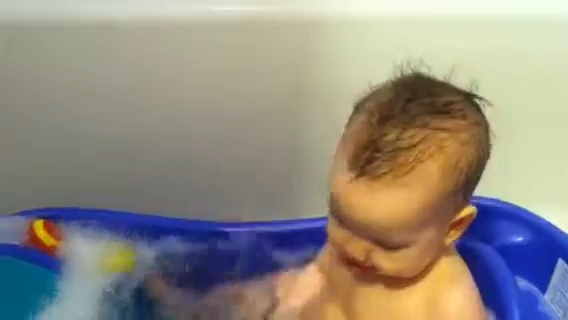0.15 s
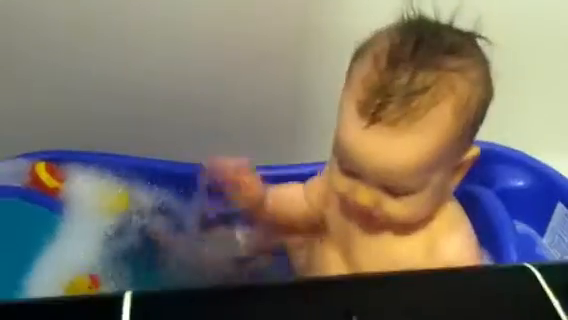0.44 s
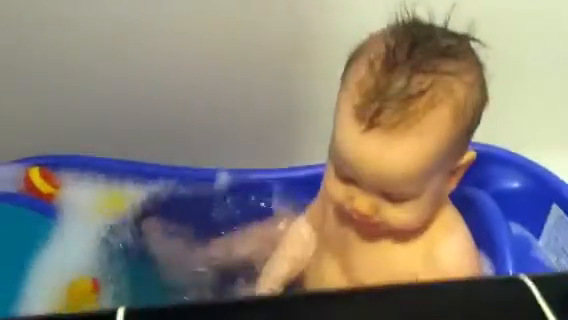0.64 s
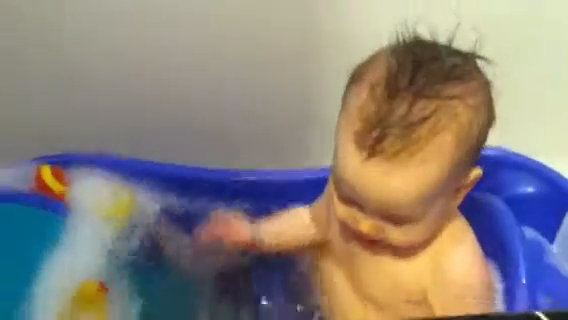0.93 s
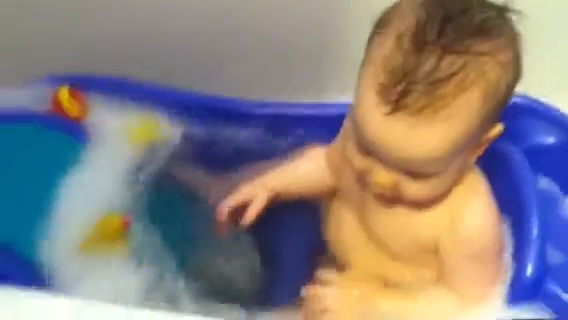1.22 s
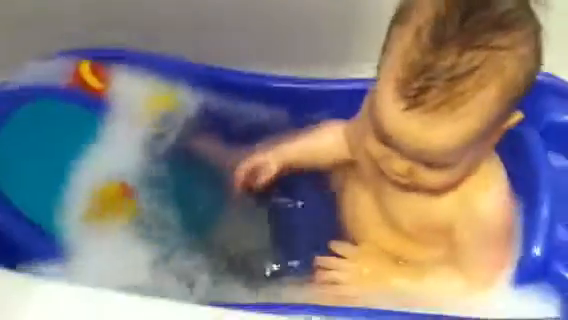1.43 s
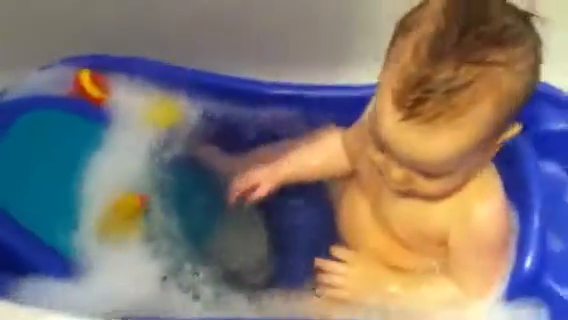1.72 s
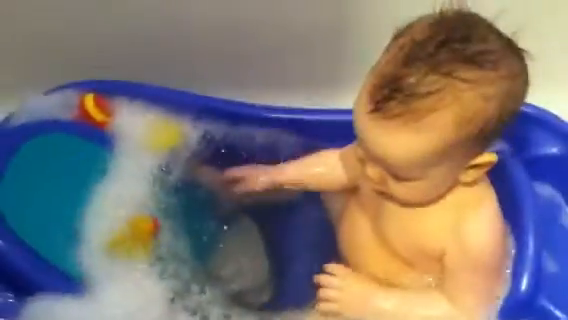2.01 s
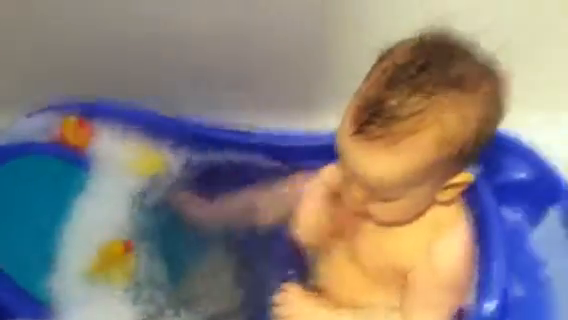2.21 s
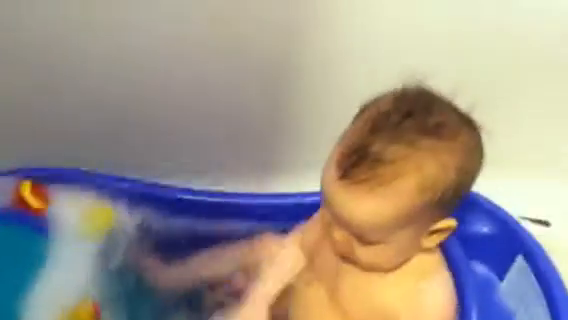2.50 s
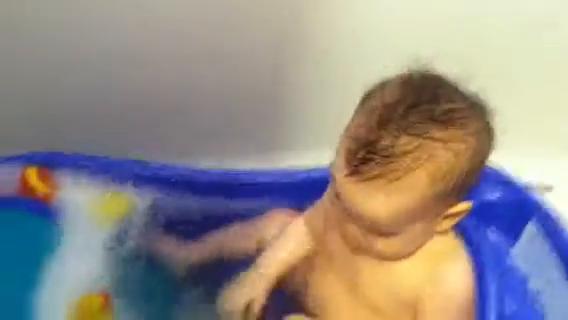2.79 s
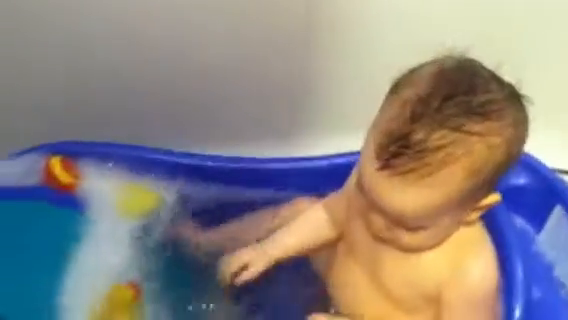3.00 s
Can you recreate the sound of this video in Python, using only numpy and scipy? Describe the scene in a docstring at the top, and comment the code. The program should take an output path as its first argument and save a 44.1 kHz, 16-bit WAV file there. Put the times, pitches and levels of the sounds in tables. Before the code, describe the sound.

Water slaps and splashes in a plastic baby tub, busy with gurgles and plinking drops at first, then a quiet lull, then one sharp loud slap near the end; small echoing bathroom, close microphone.

```python
"""Over a faint low rumble, an arm stirs clouds of bubbles and fizzing foam in a plastic tub of bath water.
Among them single drops plink, each a tick and a ringing bubble that climbs in pitch, with weaker ones behind.
A baby's slaps fall in between: a noise crack, coloured bursts of spatter for thump, plunge and spray, and a
pitched churn. The small hard-walled bathroom adds close tub echoes and a brief diffuse tail by convolution."""
import sys
import numpy as np
from scipy import signal
from scipy.fft import rfft, irfft, next_fast_len
from scipy.io import wavfile

SR = 44100
rng = np.random.default_rng(int(sys.argv[2]) if len(sys.argv) > 2 else 0)


def wav_out(sig):
    """Save sig, one row per channel (or a flat mono array), as 16-bit PCM at SR to the path in sys.argv[1]."""
    wavfile.write(sys.argv[1], SR, np.round(np.clip(np.atleast_2d(sig).T, -1, 1) * 32767).astype(np.int16))


N = 138915
TIME = np.arange(N) / SR


def from_db(db):
    """Decibels to amplitude gain."""
    return 10 ** (np.asarray(db) / 20)


def rms_one(x):
    """Scale to unit rms."""
    return x / np.sqrt(np.mean(x ** 2) + 1e-20)


def at_hz(points, hz):
    """Interpolate a (hz, value) table on a log-frequency axis."""
    table = np.array(points)
    return np.interp(np.log(hz + 1e-9), np.log(table[:, 0]), table[:, 1])


def colour(x, spectrum):
    """Causal minimum-phase filter with the shape of the spectrum and unit power gain."""
    size = 2 * next_fast_len(len(x))
    hz = np.arange(size // 2 + 1) * SR / size
    gain = rms_one(from_db(at_hz(spectrum, hz)))
    # folding the cepstrum onto positive time makes the phase minimum
    cepstrum = irfft(np.log(gain))
    cepstrum[1:size // 2] *= 2
    cepstrum[size // 2 + 1:] = 0
    response = np.exp(rfft(cepstrum))
    return irfft(rfft(x, size) * response)[:len(x)]


def octave_band(centre_hz, half_width_oct):
    """Band edges in Hz, equally far in octaves from the centre."""
    return centre_hz * 2 ** (half_width_oct * np.array([-1, 1]))


def bandpass(x, band_hz):
    """Second-order Butterworth band-pass."""
    return signal.sosfilt(signal.butter(2, band_hz, "band", fs=SR, output="sos"), x)


def add(out, start_s, sound):
    """Mix a short sound in at its start time."""
    i = int(start_s * SR)
    if 0 <= i < len(out):
        out[i:i + len(sound)] += sound[:len(out) - i]


def swell(t, rise_s, fall_s):
    """Exponential rise to 1 at t = 0, then exponential fall."""
    exponent = np.where(t < 0, t / rise_s, -t / fall_s)
    return np.exp(np.maximum(exponent, -40))


def grains(per_s, spread_db, size=N):
    """Random clicks of uneven size and sign; rms 1."""
    born = rng.random(size) < per_s / SR
    level = from_db(spread_db * np.clip(rng.standard_normal(size), -2, 2))
    return rms_one(born * level * rng.choice([-1, 1], size))


def resonance(x, hz, width_hz):
    """A two-pole resonance with gain 1 on top."""
    r = np.exp(-np.pi * width_hz / SR)
    zeros = np.array([1, 0, -1]) * (1 - r * r) / 2
    poles = [1, -2 * r * np.cos(2 * np.pi * hz / SR), r * r]
    return signal.lfilter(zeros, poles, x)


# rumble and hiss, relative spectrum: hz [Hz], density_db [dB per Hz]
RUMBLE_SPECTRUM = [(25, -14), (50, -23), (80, -8), (250, -1.5), (420, 0), (1300, -10), (2200, -11.5),
                   (9000, -21.5), (15500, -33)]
# low resonances in the rumble: hz [Hz], level_db [dB rms]
LOW_RESONANCES = [(251, -74.5), (383, -82), (551, -82)]
# one faint low hum: peak_s [s], half_length_s [s], level_db [dB rms at peak], pitch_hz [Hz]
HUM = (1.974, 0.17, -71.5, 254)
RUMBLE_DB, RESONANCE_WIDTH_HZ = -65.5, 8


def background():
    """Steady coloured noise, noise-fed low resonances and a sine hum that swells and fades."""
    out = from_db(RUMBLE_DB) * colour(rng.standard_normal(N), RUMBLE_SPECTRUM)
    for hz, level_db in LOW_RESONANCES:
        ring = resonance(rng.standard_normal(N), hz, RESONANCE_WIDTH_HZ)
        out += from_db(level_db) * rms_one(ring)
    peak_s, half_length_s, level_db, pitch_hz = HUM
    hum = rms_one(np.sin(2 * np.pi * pitch_hz * TIME))
    envelope = np.exp(-((TIME - peak_s) / half_length_s) ** 2)
    return out + from_db(level_db) * envelope * hum


PINCH_CYCLES = 1


def bubble(hz, t60_s, rise_share):
    """An air pocket pinches off, rings and climbs by a share of its pitch over one t60 near the surface."""
    t = TIME[:int(t60_s * SR) + 2]
    pinch = 1 - np.exp(-(t * hz / PINCH_CYCLES) ** 2)
    decay = from_db(-60 * t / t60_s)
    cycles = hz * (t + rise_share * t * t / (2 * t60_s))
    return pinch * decay * np.sin(2 * np.pi * cycles)


BUBBLE_T60_CYCLES, BUBBLE_RISE_SHARE, BUBBLE_SIZE_DB = 32.4, 0.079, 1   # size: rms level spread


def bubble_cloud(peak_s, rise_s, fall_s, centre_hz, spread_oct, count=64):
    """Bubbles of mixed sizes born through one swell; rms about 1 at its top."""
    out = np.zeros(N)
    place = (np.arange(count) + rng.random(count)) / count
    births_s = 2.5 * (place * (rise_s + fall_s) - rise_s)
    variations = np.sqrt(3) * rng.uniform(-1.025, 1, (count, 2))
    for birth_s, (size, pitch) in zip(births_s, variations):
        hz = centre_hz * 2 ** (spread_oct * pitch)
        level = from_db(BUBBLE_SIZE_DB * size) * np.sqrt(hz / centre_hz)
        ring = bubble(hz, BUBBLE_T60_CYCLES / hz, BUBBLE_RISE_SHARE)
        add(out, peak_s + birth_s, level * swell(birth_s, rise_s, fall_s) * ring)
    swell_energy = SR * (rise_s + fall_s) / 2
    return out * np.sqrt(swell_energy / (np.sum(out ** 2) + 1e-20))


# the arm stirs the water, or spray rains back: peak_s [s], rise_s [s], fall_s [s],
# bubbles_db [dB], bubble_hz [Hz], spread_oct [octaves], fizz_db [dB]
STIR_EVENTS = [(.01, 0.031, 0.034, -50, 2800, 0.54, -51), (.07, 0.042, 0.03, -47, 1543, 0.36, -53.5),
               (.2, 0.029, 0.062, -50.5, 786, 0.053, -52), (.236, 0.026, 0.029, -43, 2170, 0.28, -44.5),
               (.345, 0.014, 0.028, -39, 1656, 0.3, -59), (0.402, 0.019, 0.034, -42, 5230, 0.26, -44.5),
               (0.54, 0.06, 0.055, -49, 1698, 0.49, -55.5), (.628, .014, 0.053, -44.5, 892, 0.051, -44),
               (0.679, 0.02, 0.05, -44.5, 1526, 0.15, -43), (0.801, 0.039, 0.043, -51.5, 940, 0.1, -51),
               (.84, 0.028, .022, -47, 2790, 0.14, -44.5), (.903, 0.017, 0.027, -46.5, 1635, .18, -66),
               (0.964, 0.015, 0.11, -52.5, 2190, 0.6, -57), (1.119, 0.0077, 0.048, -52, 1460, 0.08, -37),
               (1.238, 0.017, 0.036, -52.5, 1054, 0.13, -52), (1.309, 0.0067, 0.022, -47, 1850, 0.1, -60),
               (1.508, .005, 0.011, -54.5, 2730, .13, -63), (2.288, 0.025, .03, -49, 2700, 0.393, -56.5),
               (2.388, 0.024, 0.017, -53.5, 1790, 0.12, -58.5),
               (2.491, 0.011, 0.023, -58.5, 3140, 0.23, -55.5), (2.703, 0.014, 0.026, -41.5, 970, 0.5, -68),
               (2.785, 0.018, 0.023, -46, 2320, 0.14, -38),
               (2.863, 0.0058, 0.024, -48.5, 2430, 0.46, -48.5),
               (2.935, 0.031, 0.064, -52, 1813, 0.34, -57), (3.005, 0.028, 0.044, -53, 607, 0.2, -83)]
# foam fizz, relative spectrum: hz [Hz], density_db [dB per Hz]
FIZZ_SPECTRUM = [(150, -49), (700, -17.5), (1800, 9.5), (3800, -2.5), (5600, 3.5), (7500, -13), (9600, -3),
                 (13000, -18), (15500, -45)]
FIZZ_GRAINS_PER_S, FIZZ_GRAIN_SPREAD_DB = 2000, 4.0
DROPLET_HZ, DROPLET_SPREAD_OCT = 5240, 0.435   # tiny ringing bubbles in the fizz
DROPLET_POWER_SHARE = 0.4


def stirs():
    """Stirred water gurgles with bubble clouds; fizz is tiny ringing bubbles plus coloured grains."""
    rings, foam = np.zeros((2, N))
    for peak_s, rise_s, fall_s, bubbles_db, bubble_hz, spread_oct, fizz_db in STIR_EVENTS:
        rings += from_db(bubbles_db) * bubble_cloud(peak_s, rise_s, fall_s, bubble_hz, spread_oct)
        droplets = bubble_cloud(peak_s, rise_s, fall_s, DROPLET_HZ, DROPLET_SPREAD_OCT)
        rings += from_db(fizz_db) * np.sqrt(DROPLET_POWER_SHARE) * droplets
        foam_swell = swell(TIME - peak_s, rise_s, fall_s)
        foam += from_db(fizz_db) * np.sqrt(1 - DROPLET_POWER_SHARE) * foam_swell
    return rings + colour(foam * grains(FIZZ_GRAINS_PER_S, FIZZ_GRAIN_SPREAD_DB), FIZZ_SPECTRUM)


def snap(decay_s, band_hz=None):
    """A 10 ms noise burst, optionally band-passed, with the energy of a unit exponential decay."""
    fade = np.exp(-TIME[:SR // 100] / decay_s)
    burst = rng.standard_normal(len(fade)) * fade
    if band_hz is not None:
        burst = bandpass(burst, band_hz)
    return burst * np.sqrt(np.sum(fade ** 2) / np.sum(burst ** 2))


# single drops and large bubbles: start_s [s], ring_db [dB], pitch_hz [Hz], t60_s [s], tick_db [dB]
DROP_EVENTS = [(0.129, -43, 2850, 0.043, -35.5), (.149, -28.5, 732, 0.043, -30.5),
               (.151, -25.5, 5000, 0.0042, -37.5), (0.231, -34.5, 5700, 0.015, -38),
               (0.248, -29, 1700, 0.021, -44), (0.406, -33.5, 5140, 0.014, -60),
               (.571, -42, 9980, 0.073, -54), (0.581, -33.5, 1793, 0.041, -44),
               (0.607, -27.5, 2630, 0.021, -44), (0.617, -34, 4360, 0.022, -41),
               (0.833, -31, 5630, 0.028, -36.5), (1.013, -30.5, 5490, 0.0092, -50),
               (1.092, -36.5, 2930, 0.012, -41.5), (1.114, -32, 1336, 0.073, -51),
               (1.133, -28.5, 2080, 0.047, -42), (1.214, -41, 587.5, 0.052, -38),
               (1.329, -21.5, 4630, 0.0024, -48), (1.498, -42, 2740, 0.018, -46.5),
               (2.182, -37.5, 2360, 0.0074, -57), (2.213, -42, 7130, 0.0052, -65),
               (2.299, -37.5, 6100, 0.013, -58), (2.351, -42.5, 1794, 0.071, -45.5),
               (2.366, -36.5, 5670, 0.0092, -47.5), (2.399, -34, 1982, 0.039, -33),
               (2.653, -29, 5900, 0.0084, -33), (2.852, -39, 1489, 0.056, -33),
               (2.857, -36.5, 3440, 0.037, -36), (2.976, -43, 4010, 0.069, -47),
               (3.059, -50, 1950, 0.077, -36)]
DROP_RISE_SHARE = 0.092
TICK_DECAY_S, TICK_HALF_WIDTH_OCT, TICK_CENTRE_RATIO = 0.0012, 0.86, 1.12   # ratio: centre / bubble pitch
SATELLITE_DB, SATELLITE_SPREAD_OCT = -8, 0.133   # level relative to the main bubble
SATELLITE_MAX_DELAY_CYCLES = 14


def drops(count=4):
    """Each drop ticks on the surface and traps one ringing bubble, with weaker ones close behind."""
    out = np.zeros(N)
    for start_s, ring_db, pitch_hz, t60_s, tick_db in DROP_EVENTS:
        band_hz = octave_band(pitch_hz * TICK_CENTRE_RATIO, TICK_HALF_WIDTH_OCT)
        band_hz = np.minimum(band_hz, [SR / 4, SR / 3])
        add(out, start_s, from_db(tick_db) * snap(TICK_DECAY_S, band_hz))
        add(out, start_s, from_db(ring_db) * bubble(pitch_hz, t60_s, DROP_RISE_SHARE))
        for late, detune in zip(rng.random(count), rng.standard_normal(count)):
            delay_s = late * SATELLITE_MAX_DELAY_CYCLES / pitch_hz
            satellite_hz = pitch_hz * 2 ** (SATELLITE_SPREAD_OCT * detune)
            satellite = bubble(satellite_hz, t60_s, DROP_RISE_SHARE)
            add(out, start_s + delay_s, from_db(ring_db + SATELLITE_DB) * satellite)
    return out


SPATTER_GRAINS_PER_S, SPATTER_GRAIN_SPREAD_DB = 7700, 3.5
CLUMP_SPREAD_DB, CLUMPS_PER_S = 2.5, 160


def spatter():
    """Grains of water that bunch into short uneven clumps; rms 1."""
    knots = rng.standard_normal(int(N / SR * CLUMPS_PER_S) + 2)
    clumps = np.interp(TIME * CLUMPS_PER_S, np.arange(len(knots)), np.clip(knots, -2, 2))
    water = grains(SPATTER_GRAINS_PER_S, SPATTER_GRAIN_SPREAD_DB)
    return rms_one(from_db(CLUMP_SPREAD_DB * clumps) * water)


# the hand hits the water: hit_s [s], rise_s [s], fall_s [s], crack_db [dB], thump_db [dB],
# plunge_db [dB], churn_db [dB], churn_hz [Hz], spray_db [dB]
SLAP_EVENTS = [(0.274, 0.0057, 0.024, -28, -46.5, -41, -29, 2150, -26),
               (0.684, 0.005, 0.045, -29, -60, -51, -43, 1496, -37),
               (0.713, 0.0027, 0.025, -26.5, -54.5, -44.5, -31, 2700, -28.5),
               (1.135, 0.016, 0.013, -44, -71, -72, -33, 2270, -50),
               (1.215, 0.0074, 0.016, -33, -55.5, -42, -35.5, 1670, -32),
               (2.402, 0.0077, 0.012, -41, -85, -68, -50.5, 2150, -47),
               (2.665, 0.0024, 0.015, -6, -44, -23, -31.5, 2200, -22.5)]
# relative spectra of the slap's parts: hz [Hz], density_db [dB per Hz]
CRACK_SPECTRUM = [(100, -52), (450, 3.5), (1250, -4), (1750, -15), (2400, 10.5), (3500, -31), (5100, 16.5),
                  (7500, 4), (12500, -4), (15500, -35)]
THUMP_SPECTRUM = [(60, -39), (130, -12.5), (260, 7.5), (400, 6), (900, -17.5)]
PLUNGE_SPECTRUM = [(100, -31), (300, -20), (540, -0.5), (1380, 6.5), (1750, -4.5), (3000, -23)]
SPRAY_SPECTRUM = [(150, -29), (1000, -31), (2500, 4), (4000, 0.5), (5500, 4), (7500, 2.5), (9600, 0.5),
                  (10900, -8.5), (12500, -7), (14000, -27), (15500, -67)]
CRACK_DECAY_S = 0.00062
THUMP_FALL_RATIO = 1.23   # heavy water settles this much more slowly than the spray
CHURN_HALF_WIDTH_OCT = 0.2
TRAPPED_AIR_DB, TRAPPED_AIR_SPREAD_OCT = -5.5, 0.258   # level relative to the churn


def slaps():
    """The palm cracks on the surface; water thumps, plunges, sprays and churns at the trapped air's pitch."""
    cracks, thump, plunge, spray, out = np.zeros((5, N))
    for (hit_s, rise_s, fall_s, crack_db, thump_db,
         plunge_db, churn_db, churn_hz, spray_db) in SLAP_EVENTS:
        force = swell(TIME - hit_s, rise_s, fall_s)
        add(cracks, hit_s, from_db(crack_db) * snap(CRACK_DECAY_S))
        thump += from_db(thump_db) * swell(TIME - hit_s, rise_s, fall_s * THUMP_FALL_RATIO)
        plunge += from_db(plunge_db) * force
        spray += from_db(spray_db) * force
        band_hz = octave_band(churn_hz, CHURN_HALF_WIDTH_OCT)
        churn = force * rms_one(bandpass(spatter(), band_hz))
        trapped_air = bubble_cloud(hit_s, rise_s, fall_s, churn_hz, TRAPPED_AIR_SPREAD_OCT)
        out += from_db(churn_db) * (churn + from_db(TRAPPED_AIR_DB) * trapped_air)
    out += colour(thump * spatter(), THUMP_SPECTRUM)
    out += colour(plunge * spatter(), PLUNGE_SPECTRUM)
    out += colour(spray * spatter(), SPRAY_SPECTRUM)
    return out + colour(cracks, CRACK_SPECTRUM)


# decay of the tail: hz [Hz], t60_s [s]
TAIL_T60 = [(150, 1), (600, 0.42), (2000, 0.37), (8500, 0.31), (15000, 0.13)]
# relative starting level of the tail: hz [Hz], level_db [dB]
TAIL_COLOUR = [(100, 3), (600, 0.5), (2000, 1.54), (5500, -0.1), (15000, 7)]
TAIL_DB, TAIL_BUILD_S = -4.5, 0.0033   # energy relative to the direct sound
TUB_DB, TUB_DECAY_S, TUB_ECHOES_PER_S = -15, 0.0074, 900   # tub and near wall


def bathroom_response():
    """Direct sound, close echoes from the tub, and a diffuse tail whose treble dies first."""
    t = TIME[:SR]
    white = rfft(rng.standard_normal(SR))
    hz = np.arange(SR // 2 + 1)
    edges_hz = np.geomspace(50, 18000, 15)
    tail = np.zeros(SR)
    for low_hz, high_hz in zip(edges_hz, edges_hz[1:]):
        centre_hz = np.sqrt(low_hz * high_hz)
        band = irfft(white * (hz >= low_hz) * (hz < high_hz), SR)
        fade = from_db(-60 * t / at_hz(TAIL_T60, centre_hz))
        tail += band * fade * from_db(at_hz(TAIL_COLOUR, centre_hz))
    tail *= 1 - np.exp(-t / TAIL_BUILD_S)
    early = grains(TUB_ECHOES_PER_S, 3.2, size=SR) * np.exp(-t / TUB_DECAY_S) * (t > 0.001)
    response = (from_db(TAIL_DB) * rms_one(tail) + from_db(TUB_DB) * rms_one(early)) / np.sqrt(SR)
    response[0] += 1   # direct sound
    return response


def scene():
    """All the water sounds through the bathroom, over the background."""
    room, floor = bathroom_response(), background()
    water = slaps() + stirs() + drops()
    return (signal.fftconvolve(water, room)[:N] + floor)[None]


CUTOFF_HZ = 15800


def record(dry):
    """A steep elliptic low-pass cuts the top."""
    lowpass = signal.ellip(10, 0.2, 80, CUTOFF_HZ, fs=SR, output="sos")
    return signal.sosfilt(lowpass, dry)


dry = scene()
out = record(dry)
wav_out(out)
```